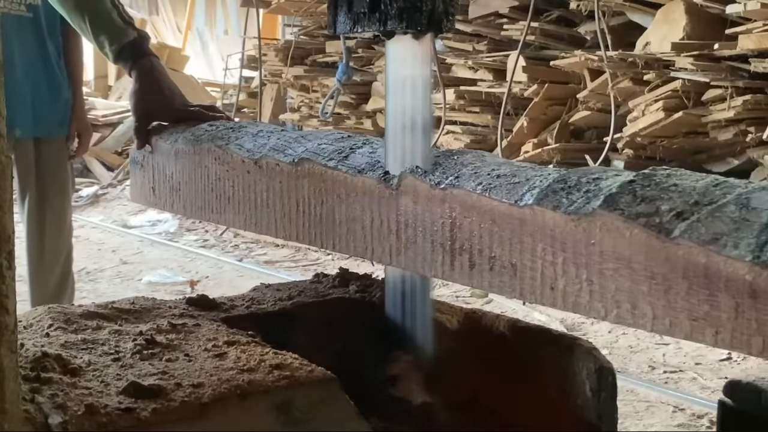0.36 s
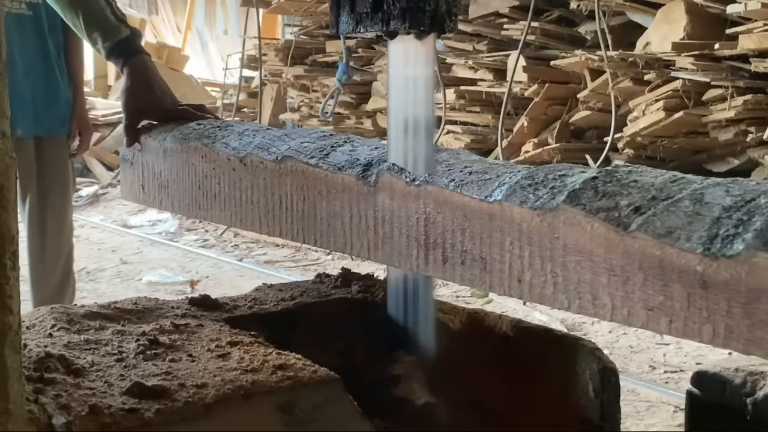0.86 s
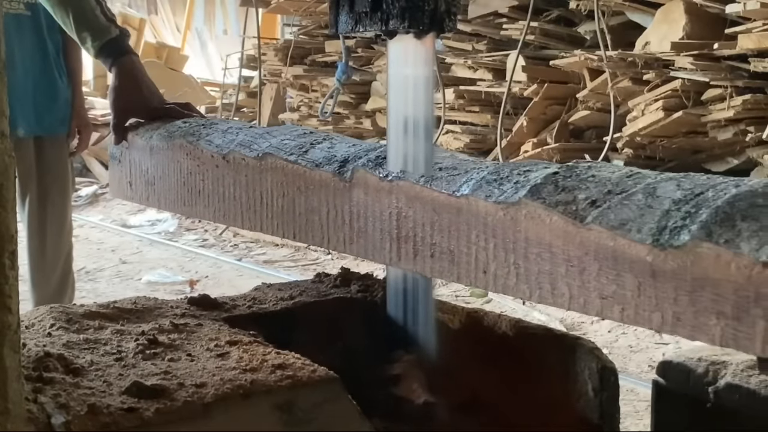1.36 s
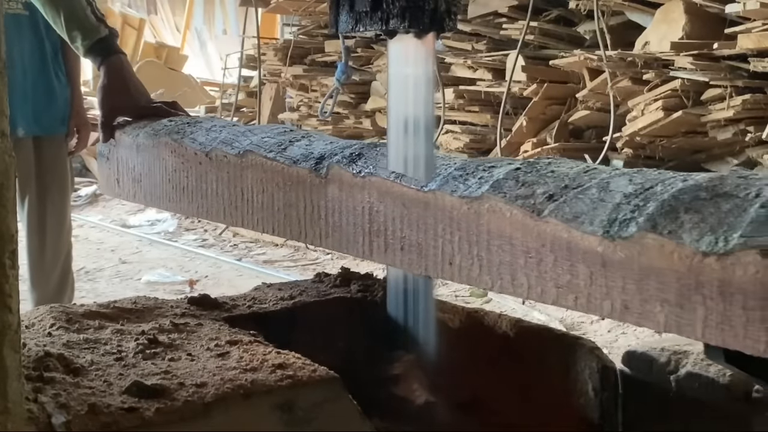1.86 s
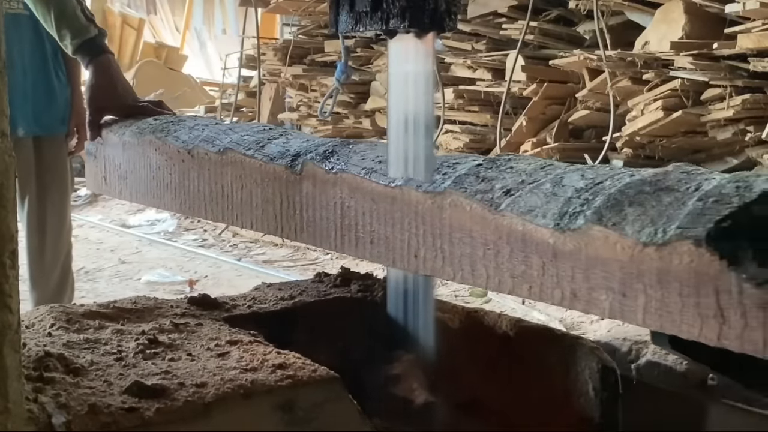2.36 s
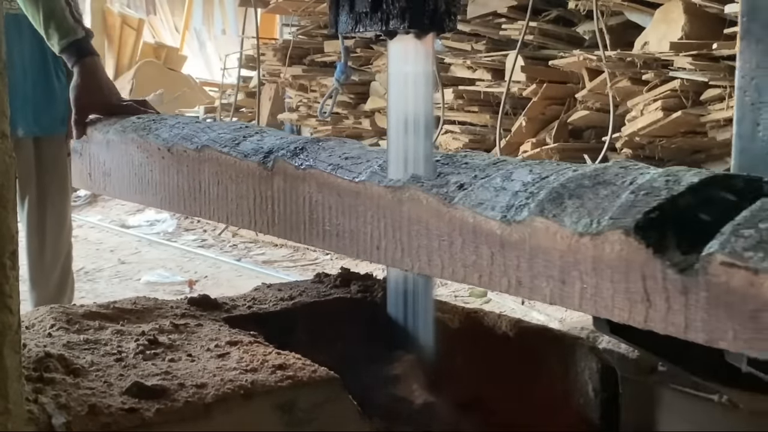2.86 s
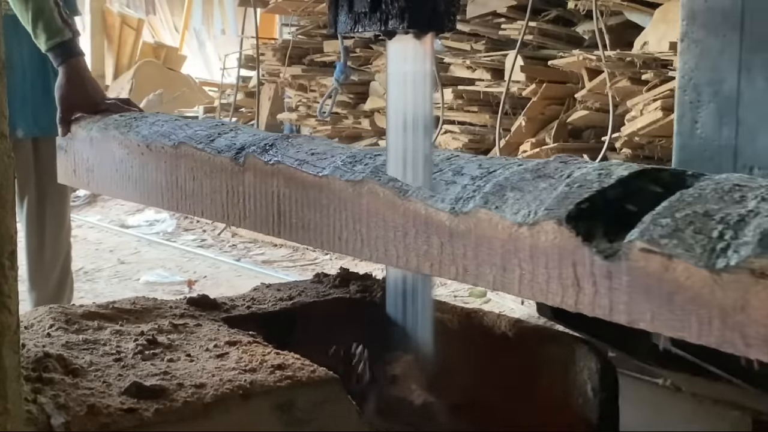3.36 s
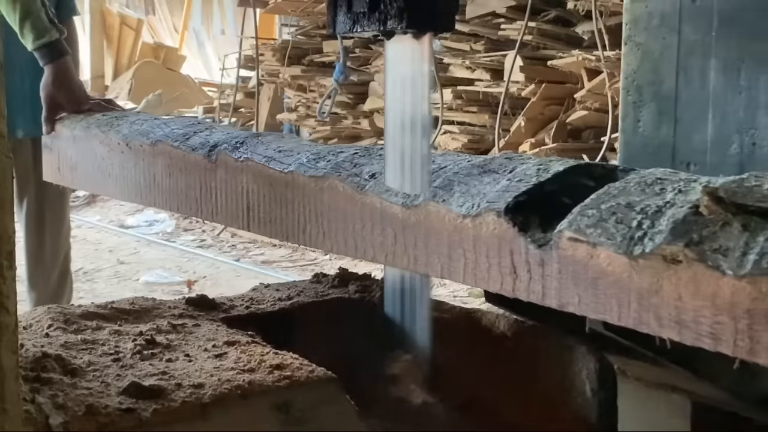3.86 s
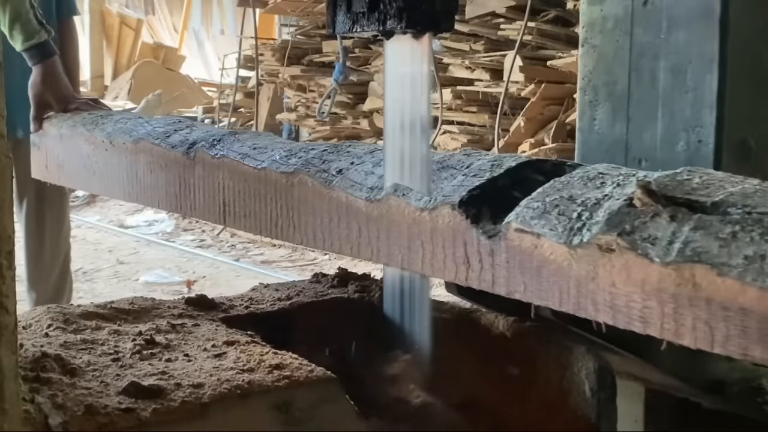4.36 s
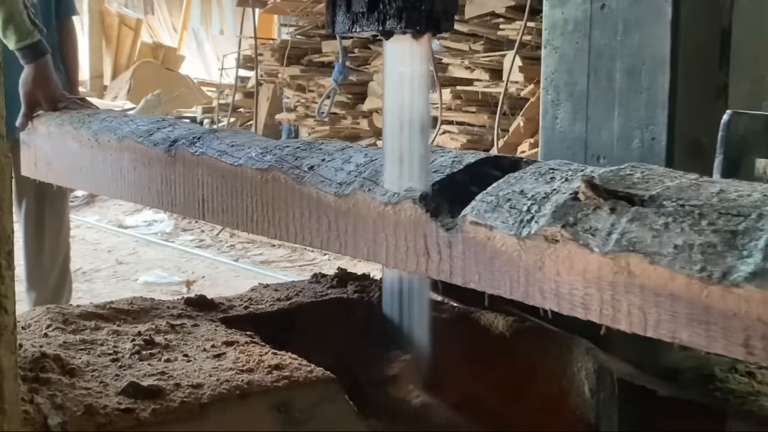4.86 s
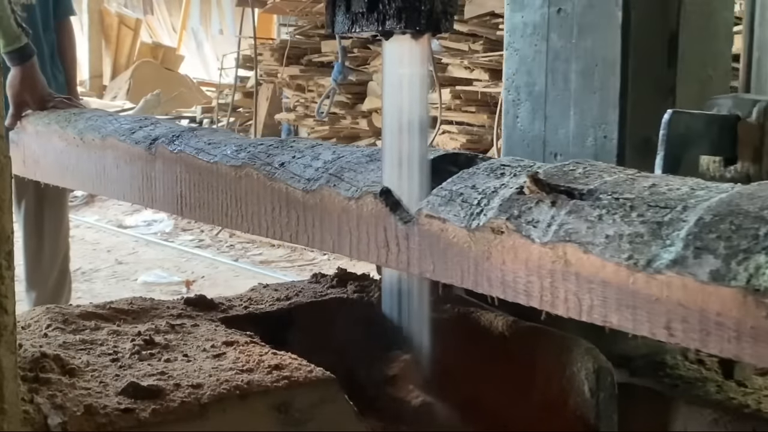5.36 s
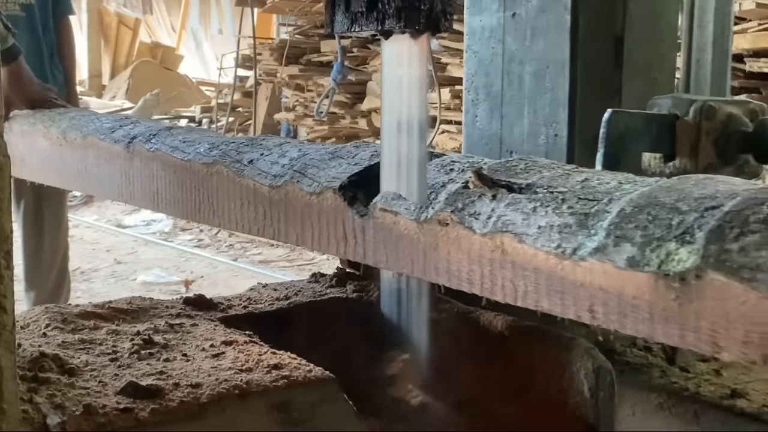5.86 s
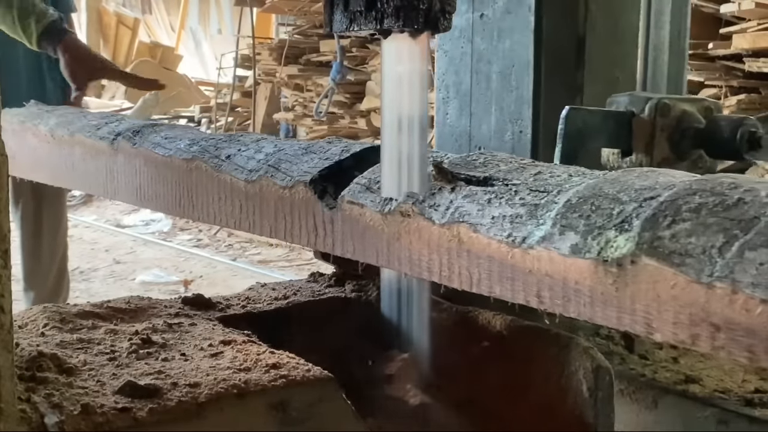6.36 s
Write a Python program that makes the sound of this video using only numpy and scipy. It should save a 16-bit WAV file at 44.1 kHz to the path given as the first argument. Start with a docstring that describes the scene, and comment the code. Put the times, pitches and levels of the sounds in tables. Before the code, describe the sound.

For about 6.5 seconds a band saw cuts a log without stopping, a couple of metres from a phone in an open sawmill. Bright, gritty hiss from tearing chips dominates, mixed with a rough high whine from the racing teeth, thin and metallic with a wavering edge. Both surge about eight times a second, two unequal swells per blade turn. The cut starts slightly stronger, eases around 0.5 s, then stays fairly even, with stronger surges near 2 and 3.2 s. Beneath is a broad roar of wheels, guides and shed, its low hum swelling around 4 s. Faint woody knocks and dull thuds follow the surges, clearer near 1.3, 2 and 4.5-5 s. One short hollow tock comes at 3.1 s. The lower whine strengthens around 5.4 s, then the hiss eases near 5.9 s; sawing continues to the end.

```python
"""A band saw whines and hisses through a log in an open sawmill, a couple of metres from a phone.
The teeth whine on multiples of their passing rate and tear chips with a bright noise; both surge twice
per loop of the blade. Wheels, guides and the shed roar behind, as filtered noise with ringing parts.
Each surge also strikes the log's resonances with a knock or thud, and loose wood gives one hollow tock."""
import sys
import numpy as np
from scipy import signal
from scipy.fft import rfft, irfft
from scipy.io import wavfile
from scipy.ndimage import uniform_filter1d

SR = 44100
rng = np.random.default_rng(int(sys.argv[2]) if len(sys.argv) > 2 else 0)


def materialize(psi):
    """Save the field psi as 16-bit PCM at rate SR to the path in sys.argv[1].

    A 1-D psi becomes a single channel; in a 2-D psi each row is a channel.
    """
    bounded = np.clip(np.atleast_2d(psi).T, -1, 1)
    quanta = np.round(bounded * 32767).astype(np.int16)
    wavfile.write(sys.argv[1], SR, quanta)


def gain_from_db(level_db):
    """Convert decibel levels to linear amplitude factors (20 dB per decade)."""
    decades = np.asarray(level_db, float) / 20
    return 10 ** decades


N = 285768
T = np.arange(N) / SR
HZ = np.maximum(np.fft.rfftfreq(N, 1 / SR), 1)
LOOP_HZ, TOOTH_HZ = 4.0622, 958.4  # turns of the blade and passing teeth per second


def level(x, db):
    """Root-mean-square scaling: set the rms level in dB re full scale."""
    return x * gain_from_db(db) / np.sqrt(np.mean(x ** 2))


def over_hz(table, axis=1):
    """Logarithmic frequency scale: interpolate one column of a table over it."""
    points = np.array(table)
    return np.interp(np.log(HZ), np.log(points[:, 0]), points[:, axis])


def colour(x, table):
    """Linear filtering: weight the spectrum by a curve in dB."""
    return irfft(rfft(x) * gain_from_db(over_hz(table)), N)


def ring(hz, width_hz, firm=0.):
    """Resonance driven by noise: a tone of wandering level and phase; firm 1 stills the level; rms 1."""
    resonance = 1 / (1 + 2j * (HZ - hz) / width_hz)
    z = np.fft.ifft(rfft(rng.standard_normal(N)) * resonance, N)  # real part and envelope in one
    return level(z.real / np.abs(z) ** np.clip(firm, 0, 1), 0)


def walk(rate_hz):
    """Slow random modulation: levels drawn at a rate and smoothed twice; spread 1."""
    hold = int(SR / rate_hz)
    steps = np.repeat(rng.standard_normal(N // hold + 1), hold)
    smooth = uniform_filter1d(uniform_filter1d(steps, hold), hold)[:N]
    return smooth / smooth.std()


# bends and high teeth of the band that bite deeper: place_loops, level_db, rise_loops, fall_loops
BAND_BENDS = [(0.06, -5, .02, 0.031), (0.125, -1.5, 0.029, 0.047), (0.46, -16, .06, .03),
              (0.545, -4, 0.038, 0.022), (0.62, -2.5, 0.028, 0.047), (0.975, -4, 0.02, 0.014)]


def bite_db():
    """Periodic modulation: the same bends and high teeth of the band return on every loop."""
    straight_db = -9  # bite of the straight parts of the band
    power = gain_from_db(straight_db) ** 2
    for place, db, rise, fall in BAND_BENDS:
        past = (T * LOOP_HZ - place + .5) % 1 - .5  # loops since the bend passed
        bump = np.exp(-.5 * (past / np.where(past < 0, rise, fall)) ** 2)
        power = power + gain_from_db(db) ** 2 * bump
    return 10 * np.log10(power)


def surge_times():
    """Periodicity: two surges, evenly spaced, for every loop of the blade."""
    first_s = .029
    return np.arange(first_s, N / SR - .01, .5 / LOOP_HZ)


# cutting level as the log feeds through: start_s, level_db
CUT_LEVEL = [(0, -18.5), (0.5, -21.5), (1.0, -19.5), (1.8, -20.5), (2.4, -19.5), (3.3, -19), (3.8, -19.8),
             (4.5, -20), (5.4, -18), (5.9, -21), (6.48, -20.5)]
# surges that stand out, against the cutting level: start_s, level_db
ODD_SURGES = [(0.643, 1.7), (0.891, 1), (1.875, -0.8), (2, 2.5), (2.245, 0.8), (3.229, 1), (3.599, 1),
              (5.076, 0.5), (5.199, -2.5), (5.446, 0), (5.936, -2)]


def cutting_db():
    """Amplitude modulation: no two surges are equally strong, and some stand out."""
    scatter_db = 0.1
    s = surge_times()
    db = np.interp(s, *np.transpose(CUT_LEVEL)) + scatter_db * rng.standard_normal(len(s))
    for at, odd_db in ODD_SURGES:
        nearest = np.abs(s - at).argmin()
        db[nearest] += odd_db
    return np.interp(T, s, db)


# relative level of the whine as bark and thickness change: start_s, deep_level_db, bright_level_db
WHINE_LEVELS = [(0, -2, -0.5), (0.6, 0.5, 0), (1.1, -2.5, -1), (1.9, 0.5, 0.5), (2.5, -3, 1.5),
                (3.0, -2.5, 2.5), (3.24, 1.5, 1.5), (3.51, -2.5, 3), (3.78, -3, -3.5), (4.05, -3, 0.5),
                (4.32, 3.5, -0.5), (4.6, -1, -3), (5.13, 4, -0.5), (5.4, 7, 2), (5.67, 1, -4.5),
                (5.94, 0, -7), (6.21, .5, 1), (6.48, -6, -1)]
# low tooth multiples and their shares of the bite and of the two whine curves:
# multiple, level_db, bite_share, deep_share, bright_share
LOW_TEETH = [(1, -48.5, 0.25, 0.84, 0.11), (2, -47, .25, 0.93, 0.22), (3, -40.5, 0.63, 0, 0.82),
             (4, -45.5, 0.81, 0.064, 1.14), (5, -45, 1, 0.049, 0.85)]


def low_teeth(bite, in_step_db):
    """Harmonics of the tooth-passing rate: noise-broadened tones, the higher the wider."""
    s, deep_db, bright_db = np.transpose(WHINE_LEVELS)
    drift_db = 1.3
    out = 0
    for k, db, depth, deep, bright in LOW_TEETH:
        hz = round(k) * TOOTH_HZ
        skirt = gain_from_db(-3.5) * ring(hz, 126.0)  # rough noise around the tone
        tone = ring(hz, 10.3 + 4.3 * k, firm=0.41) + skirt
        slow_db = np.interp(T, s, deep * deep_db + bright * bright_db) + drift_db * walk(4)
        fast_db = depth * (bite + in_step_db) + 2.26 * walk(35)
        out = out + gain_from_db(db + slow_db) * level(gain_from_db(fast_db) * tone, 0)
    return out


# upper tooth multiples, against the cutting level: multiple, level_db
HIGH_TEETH = [(6, -22.5), (7, -19.5), (8, -14.5), (9, -9), (10, -6), (11, -11), (12, -10.5), (13, -10),
              (14, -20), (15, -20), (16, -15.5)]


def high_teeth(bite, cut_db, in_step_db):
    """Upper harmonics: each wavers on its own, with a bandwidth proportional to its number."""
    out = 0
    for k, db in HIGH_TEETH:
        waver_db = 1.17 * bite + 0.35 * in_step_db + 3.12 * walk(40)
        out = out + gain_from_db(cut_db + db + waver_db) * ring(round(k) * TOOTH_HZ, 4.7 * k)
    return out


def teeth(bite, cut_db):
    """Harmonic excitation: many teeth cut at once, never evenly, so the multiples waver."""
    in_step_db = 1.73 * walk(20)  # moments when the teeth in the kerf strike together
    return low_teeth(bite, in_step_db) + high_teeth(bite, cut_db, in_step_db)


# relative spectrum of torn chips and the singing blade: frequency_hz, level_db (per Hz)
CHIP_SPECTRUM = [(500, -20), (1500, -15), (3400, -10), (4400, -12.5), (7200, -6.5), (8100, 1.5), (10100, 2),
                 (12000, -2), (13000, -1.5), (13900, -4), (14800, -10), (15400, -12)]


def chips(bite, cut_db):
    """Fracture noise: dense uneven grains that follow the bite and flicker with the wood."""
    grains = rng.standard_normal(N) * gain_from_db(1.05 * rng.exponential(size=N))
    flicker_db = 1.9 * walk(60) + 0.42 * walk(300)
    hiss = level(colour(grains, CHIP_SPECTRUM), -4.5)
    return gain_from_db(cut_db + 0.83 * bite + flicker_db) * hiss


# relative spectrum of wheels, guides and shed: frequency_hz, level_db (per Hz)
ROAR_SPECTRUM = [(25, -26), (45, -26), (70, -20), (130, -13.5), (250, -10.5), (500, -7.5), (800, 0.5),
                 (1150, -2), (1650, -4), (2000, -0.5), (2400, 1), (3400, -3), (5000, -4), (9000, -7)]
# ringing parts of the frame and their share of the low hum curve:
# pitch_hz, width_hz, level_db, wander_db, hum_share
FRAME_PARTS = [(175.5, 16, -68.5, 1.5, 0.79), (261, 21, -61.5, 2., 0.45), (396, 15, -62, 1.5, 1.3),
               (494, 4.8, -57.5, 2, 0.82), (598, 14, -59, 2, .2), (728, 13, -62, 3, -0.76),
               (1185, 14, -53.5, 2.5, 0.041), (1231, 82, -52, 0.5, 0.059)]
# relative level of the low hum as the carriage rolls on: start_s, level_db
HUM_LEVEL = [(0, -9), (0.6, -3), (1.2, 2), (2.2, -0.5), (3.24, -6), (3.85, 5), (4.3, 6.5), (4.7, 2.5),
             (5.2, -2), (5.6, 4), (6.48, 3)]


def roar(bite):
    """Broadband noise and resonance: roar leans a little on the bite; frame parts swell and fade."""
    swell_db = 0.098 * (bite - bite.mean()) + 0.21 * walk(1.4) + 1.0 * walk(13)
    out = gain_from_db(swell_db) * level(colour(rng.standard_normal(N), ROAR_SPECTRUM), -34.5)
    hum_db = np.interp(T, *np.transpose(HUM_LEVEL))
    for hz, width, db, wander_db, share in FRAME_PARTS:
        part_db = db + share * hum_db + wander_db * walk(1.85)
        out = out + gain_from_db(part_db) * ring(hz, width, firm=0.42)
    return out


def blows(loud, faint_db):
    """Impulse excitation: a faint blow of chance strength per surge, unless a loud one is close."""
    s = surge_times()
    db = faint_db + 5 * rng.standard_normal(len(s))
    s = s + 0.00188 * rng.standard_normal(len(s))
    loud_s, loud_db = np.transpose(loud)
    apart_s = np.abs(s[:, None] - loud_s).min(axis=1)
    out = np.zeros(N)
    out[(s * SR).astype(int)] = gain_from_db(db) * (apart_s > .125 / LOOP_HZ)  # a quarter of the surge spacing
    out[(loud_s * SR).astype(int)] = gain_from_db(loud_db)
    return out


# relative resonances of the knocked log: pitch_hz, width_hz, level_db
LOG_MODES = [(308, 59, 2), (510, 150, 5), (830, 77, -3)]
# the loudest woody knocks: start_s, level_db (peak)
LOUD_KNOCKS = [(0.152, -37), (0.767, -36), (1.014, -38), (1.137, -39), (1.26, -32), (1.752, -34), (2, -33),
               (2.245, -36), (2.491, -39), (2.614, -35), (2.983, -38), (3.104, -39), (4.459, -35),
               (4.706, -36), (4.83, -36), (4.954, -35), (5.446, -39), (6.183, -35)]
# the loudest low thuds: start_s, level_db (peak)
LOUD_THUDS = [(0.275, -43), (0.398, -44), (0.767, -50), (1.014, -42), (1.26, -48), (2.12, -42),
              (3.112, -47), (3.474, -45), (3.969, -47), (4.459, -48), (4.83, -49), (5.57, -46),
              (5.813, -49)]


def knocks():
    """Dispersion of bending waves: each surge bends the log, and low pitches arrive later than high."""
    dispersion = np.exp(-4j * np.pi * HZ * .135 / np.sqrt(HZ))  # delay .135 / sqrt(Hz) seconds
    thud = 1 / (1 + (HZ / 270.0) ** 4) / (1 + (42.0 / HZ) ** 4)
    knock = sum(gain_from_db(db) / (1 + 2j * (HZ - hz) / width) for hz, width, db in LOG_MODES)
    out = 0
    for loud, faint_db, modes in ((LOUD_THUDS, -54, thud), (LOUD_KNOCKS, -43.5, knock)):
        body = modes * dispersion
        peak = np.abs(irfft(body, N)).max()
        out = out + irfft(rfft(blows(loud, faint_db)) * body / peak, N)
    return out


# hollow wooden tock: start_s, level_db (before onset and decay), pitch_hz, width_hz
WOOD_TOCKS = [(3.099, -24, 830, 45)]


def tocks():
    """Damped free vibration: a short ring of loose wood with a soft onset."""
    out = 0
    for s, db, hz, width in WOOD_TOCKS:
        age = np.maximum(T - s, 0)
        envelope = (1 - np.exp(-age / 0.0032)) * np.exp(-np.pi * width * age)
        out = out + gain_from_db(db) * envelope * np.sin(2 * np.pi * hz * age)
    return out


# stereo likeness and balance by frequency: frequency_hz, likeness (0-1), left_minus_right_db
STEREO_LIKENESS = [(40, .998, 0), (130, .93, .5), (290, .85, 2.3), (640, .45, 2.2), (1000, .35, 1.6),
                   (1500, .45, 1.2), (1900, .8, .4), (2200, 1, 0), (7300, 1, 0), (7900, .87, 0),
                   (8750, .998, 0), (9200, .998, 0), (10100, .9, 0), (10900, .995, 0), (11400, .995, 0),
                   (12200, .88, 0), (13000, .997, 0), (13450, .997, 0), (14300, .78, 0), (14900, .96, 0),
                   (15100, 1, 0)]
# stereo phase by frequency: frequency_hz, left_lag_cycles
STEREO_LAG = [(0, 0), (500, -.09), (950, -.17), (1200, -.02), (1550, -.11), (2100, 0), (7300, 0),
              (7600, .14), (8870, .49), (9100, .51), (11150, 1), (13080, 1.485), (13420, 1.515),
              (14400, 1.78), (14800, 1.92), (15200, 2)]
# narrow dip in the brightness: centre_hz, width_hz, amplitude_share_lost
TREBLE_DIP = 9000, 600, .4


def scene():
    """Partial coherence: part of the sound is alike in left and right, part differs, by frequency."""
    bite, cut_db = bite_db(), cutting_db()
    direct, scattered = (rfft(teeth(bite, cut_db) + chips(bite, cut_db) + roar(bite)) for _ in range(2))
    like = np.clip(over_hz(STEREO_LIKENESS), 0, 1)
    shared = direct * np.sqrt((1 + like) / 2) + rfft(knocks() + tocks())
    apart = scattered * np.sqrt((1 - like) / 2)
    sign = np.array([[1], [-1]])  # left, right
    balance = gain_from_db(sign * over_hz(STEREO_LIKENESS, axis=2) / 2)
    phase = np.exp(-1j * np.pi * sign * np.interp(HZ, *np.transpose(STEREO_LAG)))
    hz, width, share = TREBLE_DIP
    dip = 1 - share * np.exp(-((HZ - hz) / width * 2) ** 2)
    return irfft((shared + sign * apart) * balance * phase * dip, N)


def band_limit(x):
    """A steep low-pass at the top of the band."""
    return signal.sosfilt(signal.butter(12, 16810, fs=SR, output="sos"), x)


def record(dry):
    """Band limiting: the phone's microphone drops the deepest bass and the top is cut steeply."""
    bass_cut = signal.butter(3, 42., "high", fs=SR, output="sos")
    top_cut = signal.ellip(16, .2, 110, 15450, fs=SR, output="sos")
    mix = signal.sosfilt(top_cut, signal.sosfilt(bass_cut, dry))
    return band_limit(mix)


dry = scene()
out = record(dry)
materialize(out)
```